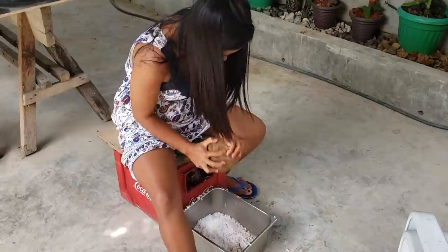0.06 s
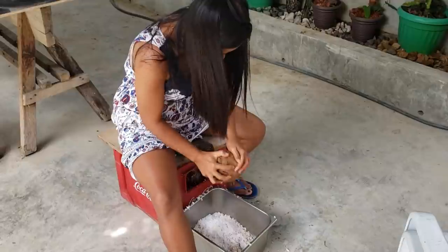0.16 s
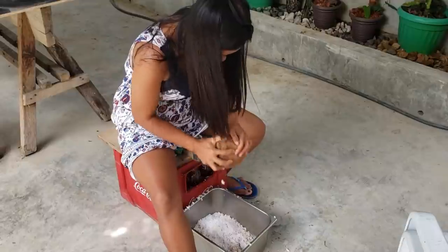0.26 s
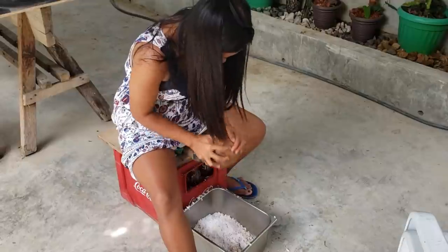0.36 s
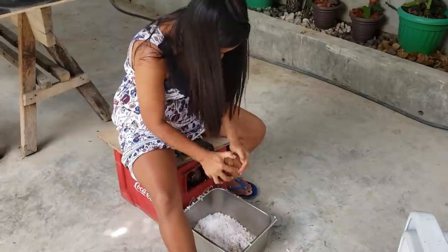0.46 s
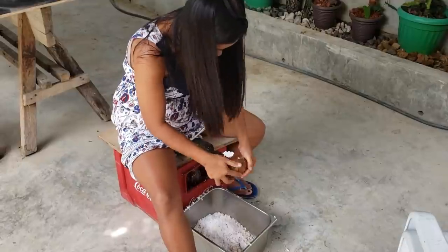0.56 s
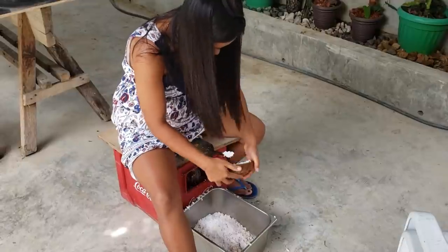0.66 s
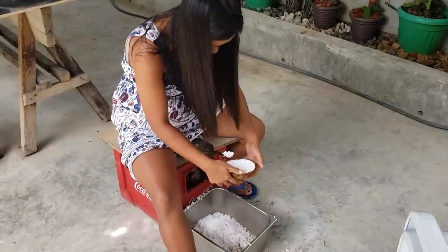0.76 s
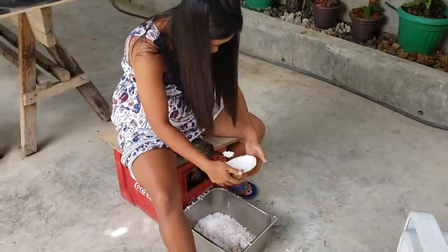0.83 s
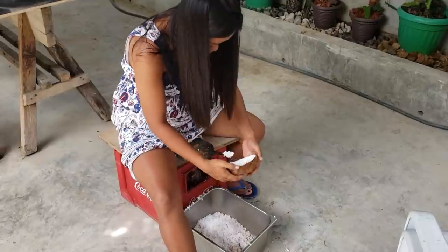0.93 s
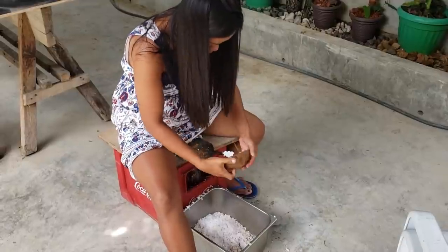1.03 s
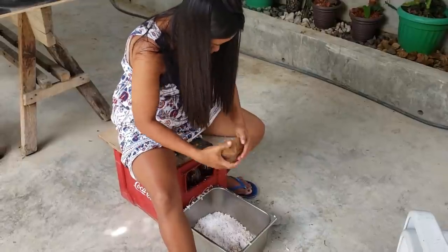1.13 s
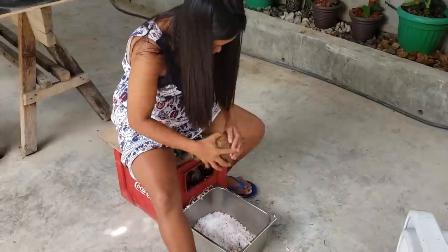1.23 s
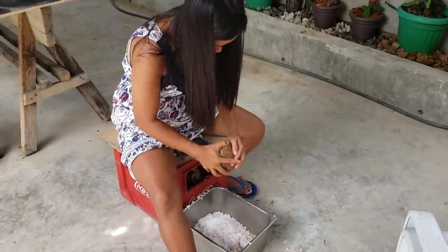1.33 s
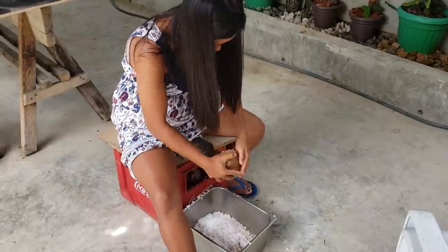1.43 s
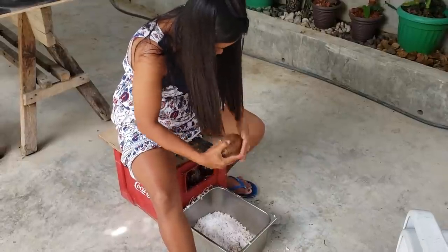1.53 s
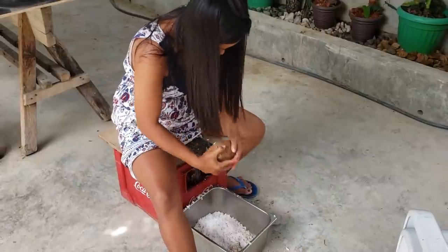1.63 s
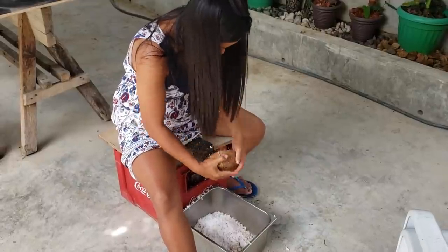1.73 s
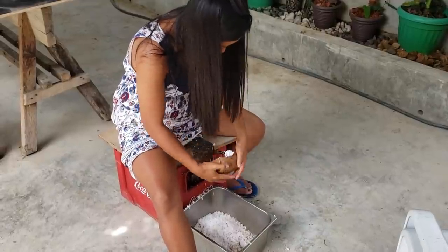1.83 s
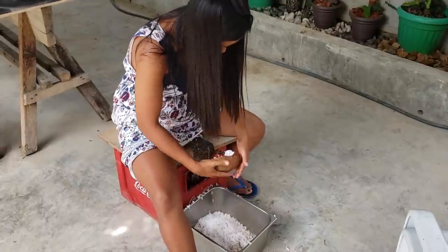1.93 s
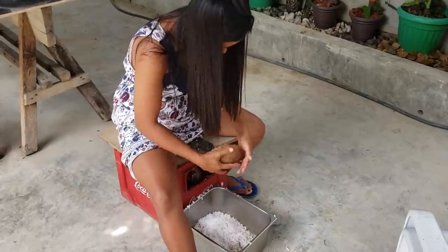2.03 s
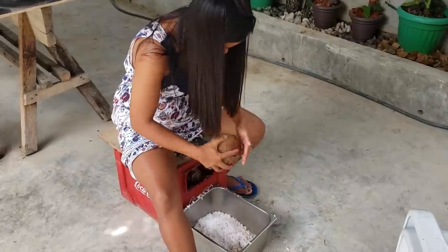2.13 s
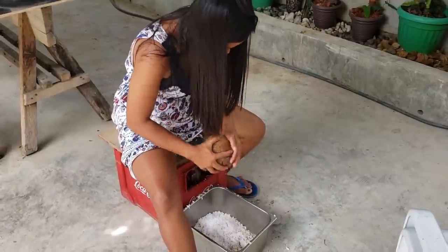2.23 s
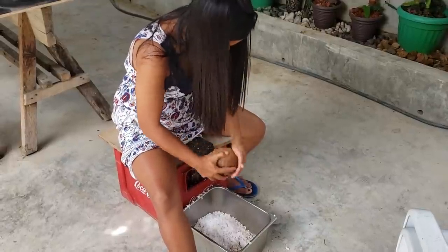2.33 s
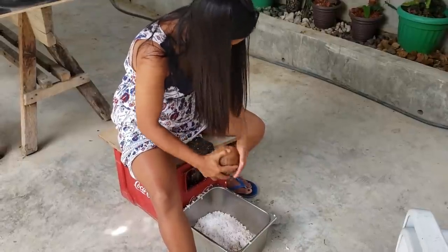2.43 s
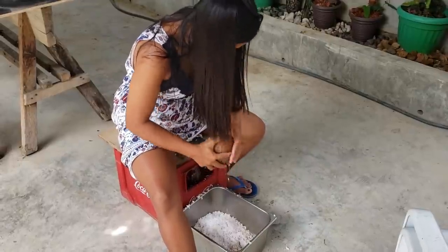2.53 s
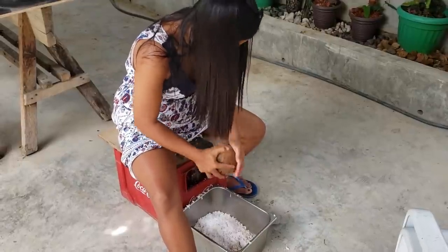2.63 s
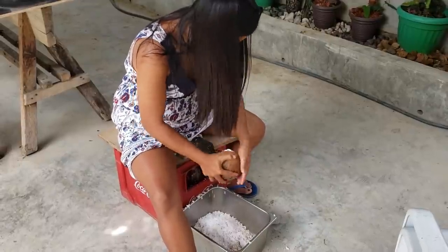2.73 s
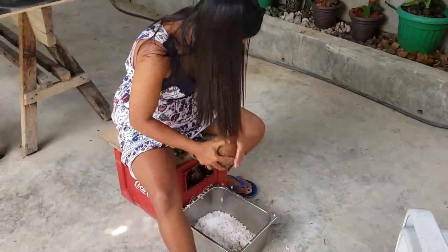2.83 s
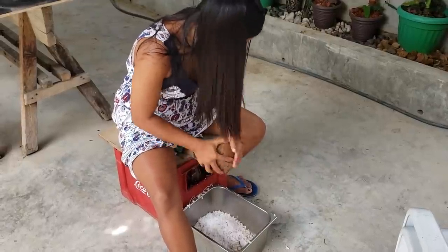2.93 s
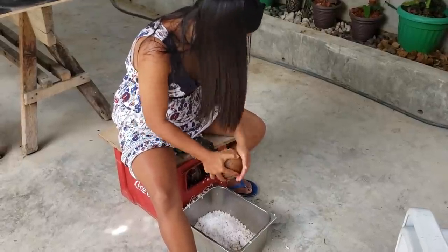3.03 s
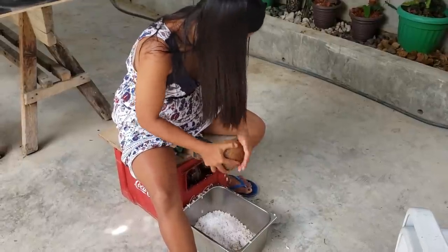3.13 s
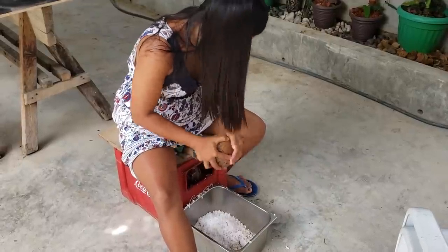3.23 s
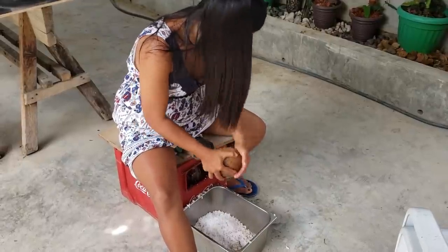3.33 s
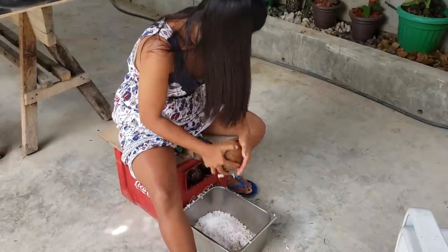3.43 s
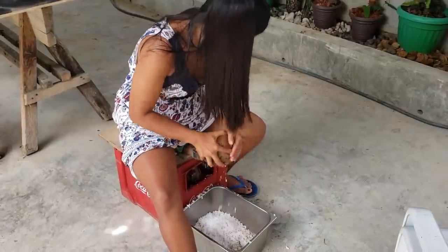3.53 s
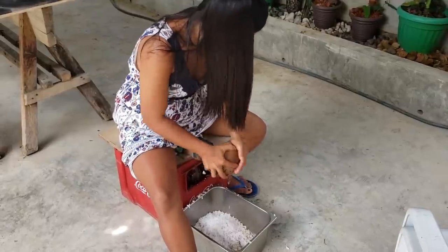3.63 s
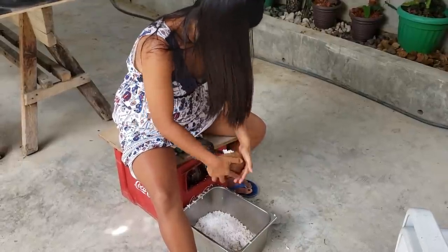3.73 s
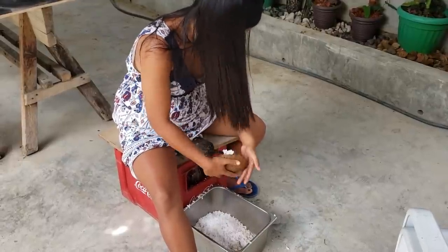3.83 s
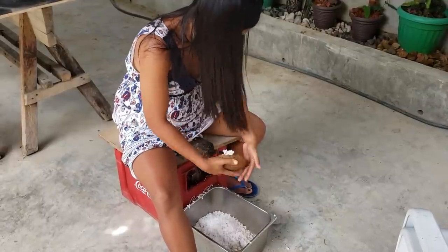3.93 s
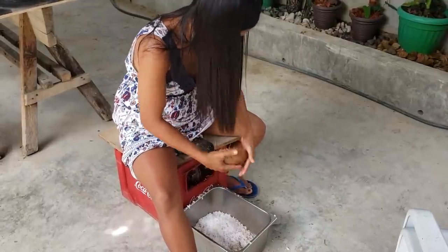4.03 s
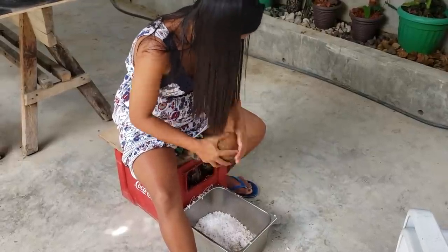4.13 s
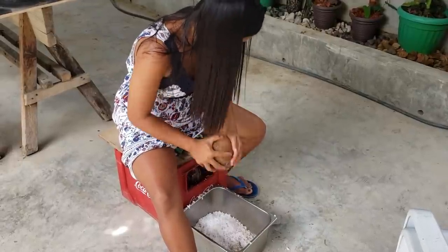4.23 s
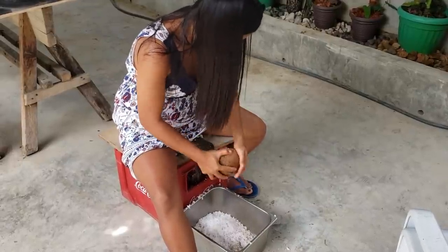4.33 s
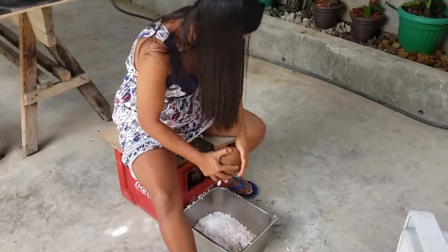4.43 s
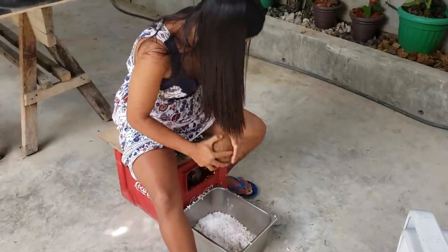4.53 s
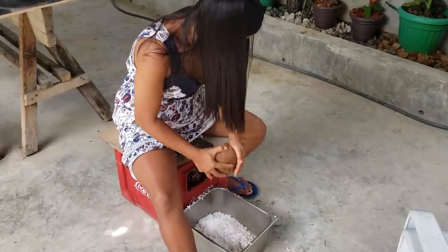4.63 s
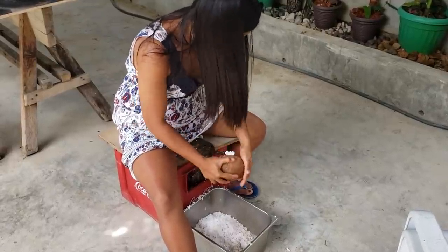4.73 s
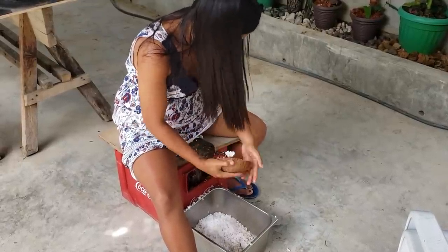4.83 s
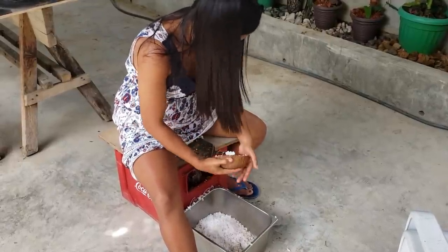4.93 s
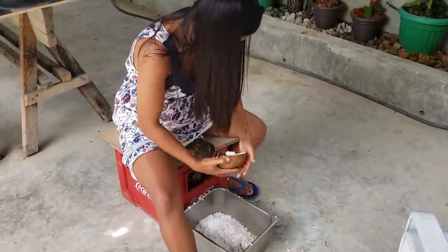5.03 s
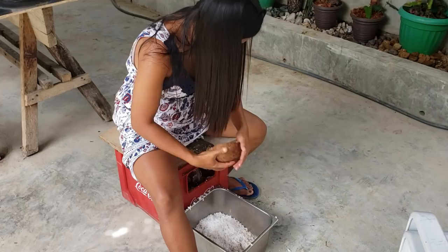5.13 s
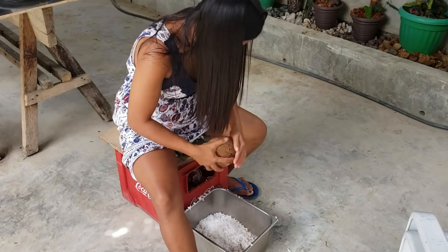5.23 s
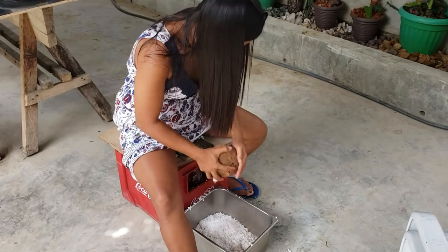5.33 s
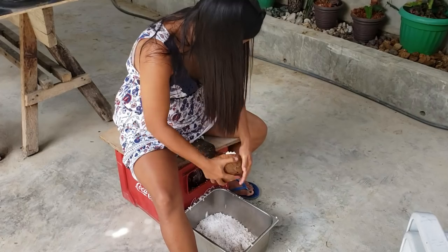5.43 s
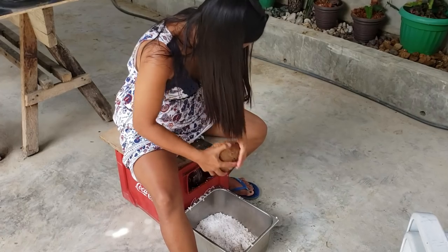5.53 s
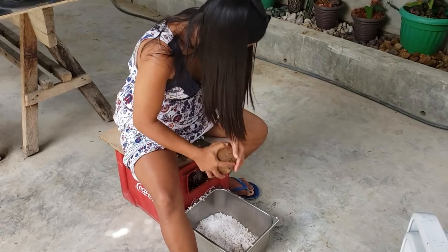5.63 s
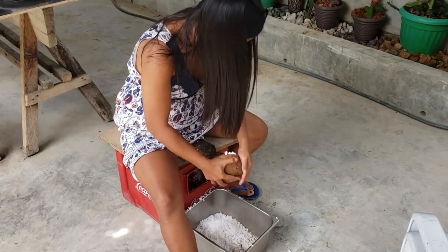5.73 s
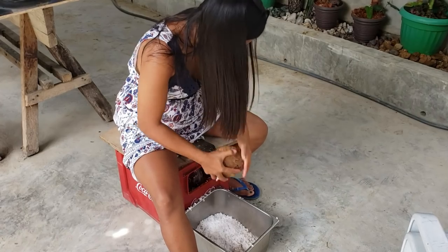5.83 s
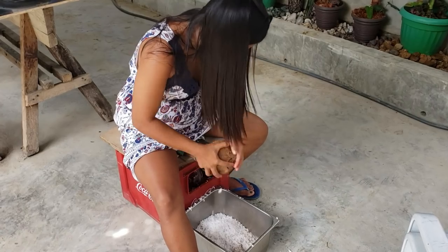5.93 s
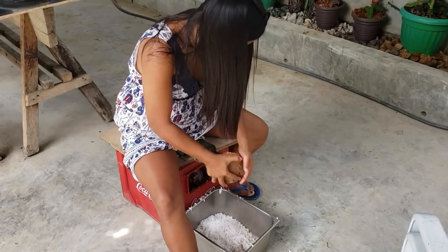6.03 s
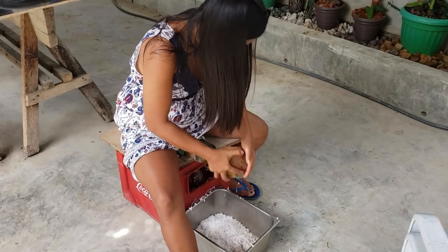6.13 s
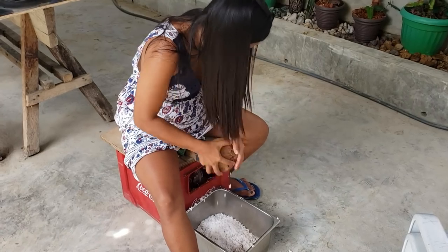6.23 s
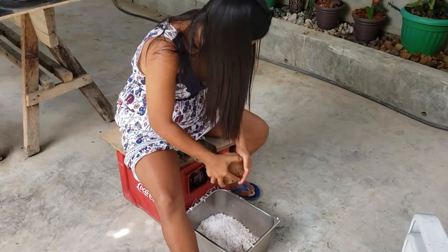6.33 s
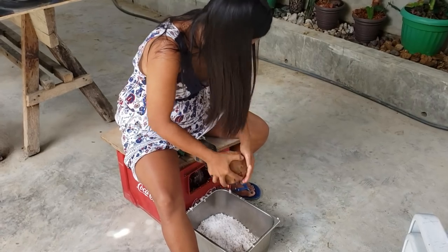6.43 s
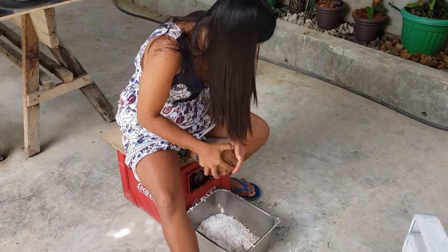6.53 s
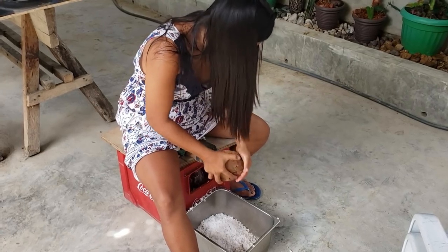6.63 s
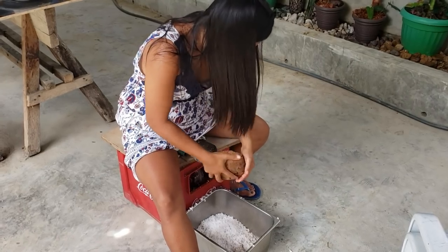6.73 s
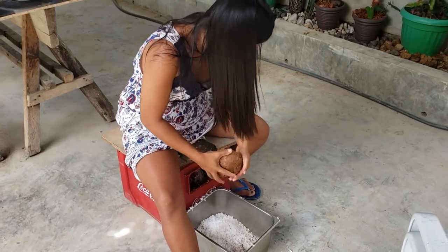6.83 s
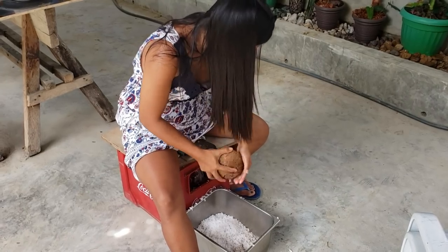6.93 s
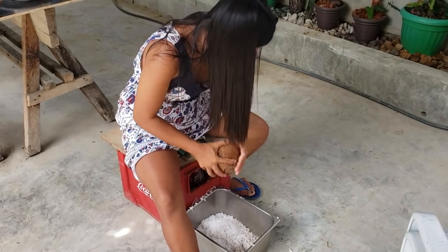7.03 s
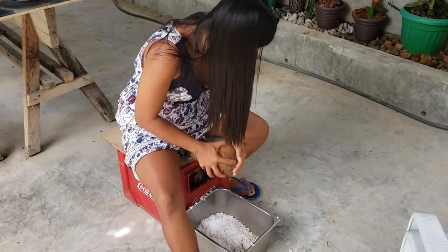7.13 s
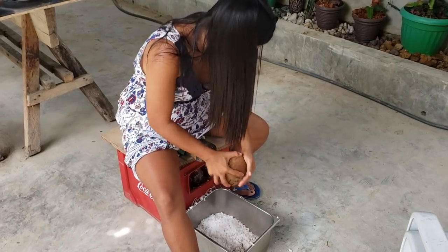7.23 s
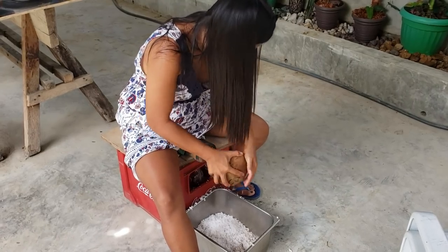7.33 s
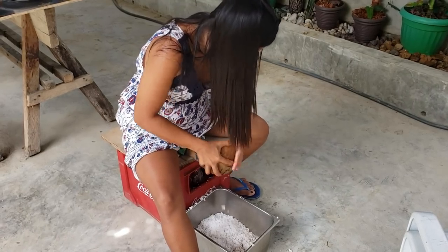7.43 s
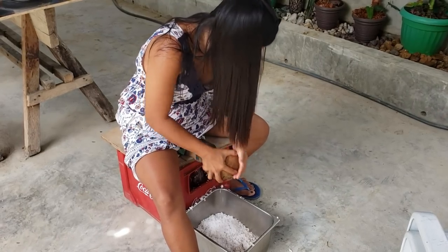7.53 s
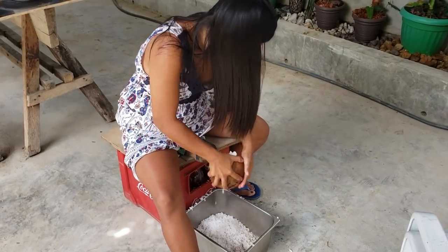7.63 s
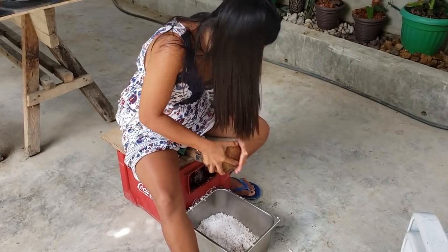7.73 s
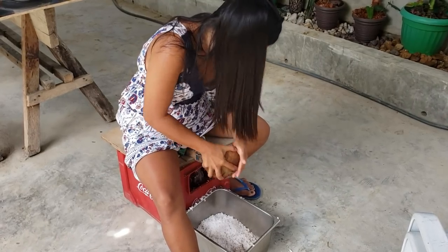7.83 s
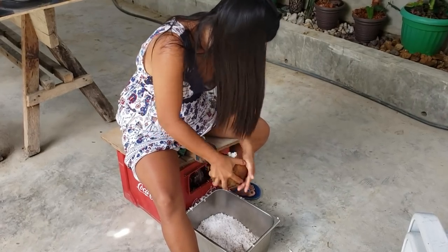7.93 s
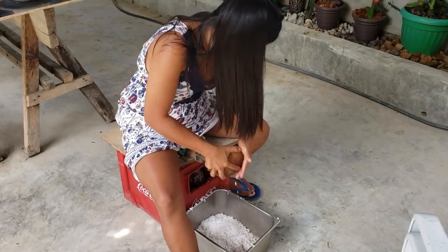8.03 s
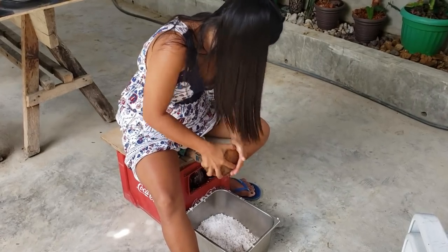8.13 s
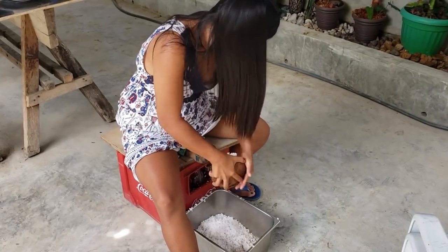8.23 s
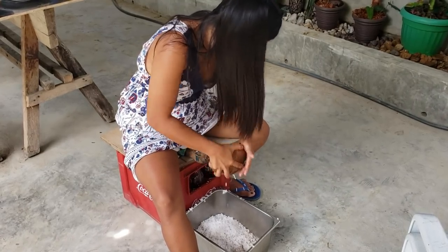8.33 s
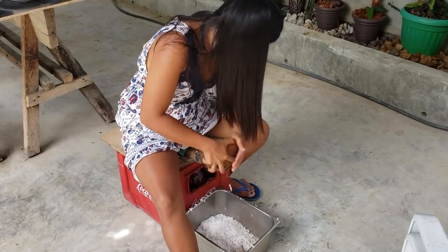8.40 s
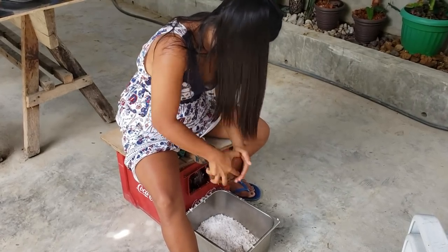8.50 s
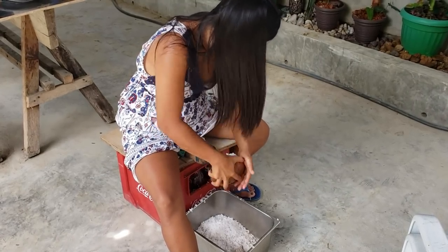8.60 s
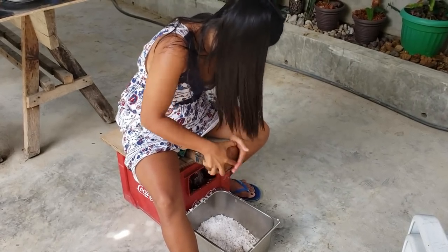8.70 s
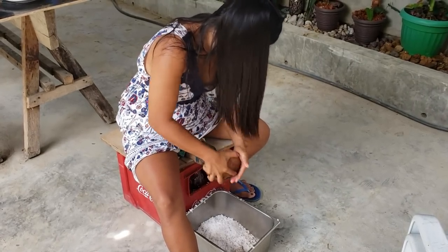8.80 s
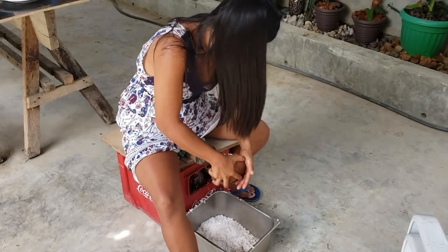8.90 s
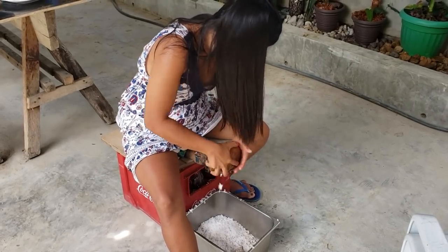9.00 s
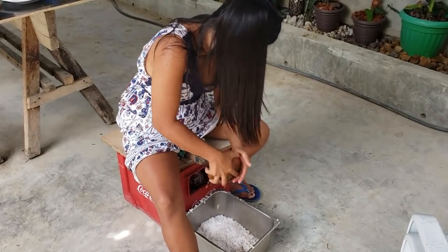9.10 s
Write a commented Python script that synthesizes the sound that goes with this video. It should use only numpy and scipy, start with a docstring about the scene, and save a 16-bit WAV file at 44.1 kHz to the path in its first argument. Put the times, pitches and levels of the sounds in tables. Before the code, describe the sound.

Two sharp scrapes open, then a short pause with soft rustles and tiny distant chirps. Steady coconut scraping follows: gritty tearing, low woody drumming, occasional hard shell clacks and a faint blade ring. A few beats are skipped mid-way, then strokes continue to the end. Close stereo pickup, short concrete reverberation, quiet rumbling outdoor background.

```python
"""Coconut scraped on a toothed blade

A coconut half is pushed down a toothed steel blade that is fixed to a board on a hollow plastic crate.
The teeth catch and slip, which drums the board and crate, and tear the flesh, which rasps and rings the blade.
Impulses and knocks drive resonant bodies; shaped noise makes the tearing, the soft rustles and the yard.
A covered concrete yard answers and hums faintly under far birds; two microphone ports listen from the side."""
import sys
import numpy as np
from scipy import signal
from scipy.fft import rfft, irfft, next_fast_len
from scipy.io import wavfile
from scipy.ndimage import uniform_filter1d, map_coordinates

SR = 44100
rng = np.random.default_rng(int(sys.argv[2]) if len(sys.argv) > 2 else 0)


def file_out(sig):
    """Save sig as 16-bit WAV at sys.argv[1]."""
    # one column per channel
    cols = np.atleast_2d(sig).T
    # limit, then scale
    lim = np.clip(cols, -1, 1)
    pcm = np.round(lim * 32767).astype(np.int16)
    wavfile.write(sys.argv[1], SR, pcm)


N = 403956  # samples

# The shell meets the blade or catches hard. Each row: time in seconds, then relative levels in dB of
# the thump, the clack of the shell and the boom of the crate.
KNOCKS = [(0.087, -23, -49, -47), (0.11, -21.5, -51, -27), (0.371, -21, -44, -46), (0.424, -12, -25, -40),
          (1.179, -34.5, -47, -58), (1.327, -19, -48, -56), (1.596, -20.5, -43, -41),
          (1.695, -21, -44, -40), (2.288, -32, -57, -37), (2.64, -10.5, -54, -41), (2.991, -17, -48, -44),
          (3.303, -9, -24, -21.5), (3.56, -21.5, -44, -39), (3.643, -9, -42, -49), (3.675, -11, -43, -56),
          (4.336, -17, -26, -44), (4.656, -9.5, -13, -24), (4.688, -25, -29, -33), (5.317, -23, -46, -37),
          (5.619, -27.5, -59, -60), (5.661, -27, -50, -54), (6.054, -13, -25, -28), (6.073, -23, -37, -52),
          (6.275, -27, -54, -35), (6.588, -24.5, -40, -35), (6.623, -18, -34, -32),
          (7.545, -23.5, -38, -34), (7.822, -30, -53, -39), (8.134, -20.5, -51, -42),
          (8.184, -12.5, -26, -31), (8.465, -27.5, -49, -41), (8.51, -21.5, -41, -45),
          (8.757, -30, -58, -42), (8.822, -9.5, -17, -25), (9.086, -22, -48, -47)]


def amp(db):
    """Decibels are logarithmic: 20 dB is a tenfold gain."""
    return 10 ** (np.asarray(db) / 20)


def unit(x):
    """Normalisation by the root mean square, to rms 1."""
    return x / np.sqrt(np.mean(x ** 2) + 1e-20)


def along(points, hz):
    """Interpolation of (Hz, value) points on a logarithmic frequency axis."""
    f, v = np.transpose(points)
    return np.interp(np.log(hz + 1), np.log(f + 1), v)


def wobble(rate):
    """Slow random modulation: a smooth curve through normal random knots, rate of them a second."""
    knots = rng.standard_normal(int(N * rate / SR) + 4)
    return map_coordinates(knots, [np.arange(N) * rate / SR])


def filtered(x, response):
    """Linear filtering: the spectrum of x times a complex response of frequency."""
    m = next_fast_len(N + SR // 2)
    spectrum = rfft(x, m) * response(np.fft.rfftfreq(m, 1 / SR))
    return irfft(spectrum, m)[..., :N]


def ringing(modes):
    """Modal superposition: damped resonances of alternating sign add up to a body's causal response."""
    def response(f):
        return sum((-1) ** k * amp(db) * 1j * f * width / (centre ** 2 - f * f + 1j * f * width)
                   for k, (centre, width, db) in enumerate(modes))
    return response


def through(force, response):
    """Source and filter: a body driven by a force, scaled so that white driving would keep its rms."""
    power = np.mean(np.abs(response(np.linspace(1, SR / 2, 8192))) ** 2)
    return filtered(force, response) / np.sqrt(power)


def slips(rate, scatter_db):
    """Stick-slip as random impulses of either sign, rate a second, rms 1; some are much larger."""
    happen = rng.random(N) < rate / SR
    size = amp(scatter_db * np.minimum(rng.exponential(size=N), 4))
    return unit(happen * size * rng.choice([-1, 1], size=N))


def spread(pair):
    """Diffuse-field coherence: unrelated signals are mixed so that bass is shared and treble is not."""
    # Each row: frequency in Hz, left-right correlation from -1 to 1.
    likeness = [(60, 0.8), (180, 1), (550, 0.71), (1650, -0.097), (4970, 0.012), (15000, -0.023)]

    def turn(hz):
        return np.arccos(np.clip(along(likeness, hz), -1, 1)) / 2

    mid, side = filtered(pair, lambda hz: np.array([np.cos(turn(hz)), np.sin(turn(hz))]))
    return np.array([mid + side, mid - side])


def yard():
    """Ambient noise of far traffic and leaves: a patchy spectrum whose overall level drifts."""
    # Spectrum of the yard at rest. Each row: frequency in Hz, relative density in dB per Hz.
    colour = [(15, -44), (32, -7), (59, 3.5), (107, -4), (169, -5.5), (267, -11.5), (380, -12.5),
              (800, -21.5), (2200, -19), (4000, -21), (6000, -26), (8200, -31.5), (11200, -28),
              (15600, -44)]
    # Course of the level before its random drift. Each row: time in seconds, level in dB.
    level_points = [(0, -46.5), (.9, -49), (2.1, -49), (4, -48.5), (5.1, -48.5), (6.9, -46.5), (7.8, -46.5),
                    (9.16, -47.5)]
    z = signal.stft(rng.standard_normal((2, N)), nperseg=1024)[2]
    # Smooth random patches over frequency, then time
    patches = uniform_filter1d(rng.standard_normal(z.shape[1:]), 8, 0)
    patches = uniform_filter1d(patches, 6, 1)
    pair = signal.istft(z * amp(1.26 * unit(patches)), nperseg=1024)[1][:, :N]
    coloured = filtered(pair, lambda hz: amp(along(colour, hz)))
    level_db = np.interp(np.arange(N) / SR, *np.transpose(level_points)) + 2.1 * wobble(2.55)
    return amp(level_db) * unit(spread(coloured))


def birds():
    """Thin chirps of far birds: sine tones with a random walk in phase, so slightly unsteady in pitch."""
    # Each row: centre time in seconds, length in seconds, frequency in Hz, peak level in dB.
    chirps = [(.86, .04, 4750, -57), (.815, .03, 6250, -62), (.495, .03, 5700, -48), (1.53, .04, 4200, -59)]
    out = np.zeros(N)
    for s, length, hz, db in chirps:
        t = np.arange(int(length * SR))
        phase = 2 * np.pi * hz * t / SR + np.cumsum(rng.normal(0, 0.076, len(t)))
        start = round((s - length / 2) * SR)
        out[start:][:len(t)] += amp(db) * np.hanning(len(t)) * np.sin(phase)
    return out


def walls(x):
    """Reverberation of roof and walls: decaying noise tails, renewed as the worker sways."""
    # Each row: frequency in Hz, time in seconds to decay by 60 dB.
    decay = [(100, 0.2), (400, 0.34), (2000, 0.41), (8000, 0.18)]
    out, step = np.zeros((2, N + SR)), SR // 3
    for start in range(0, N, step):
        hz, t, z = signal.stft(rng.standard_normal((2, SR // 2)), SR, nperseg=256)
        fall_db = -60 * t / along(decay, hz)[:, None]
        tail = signal.istft(z * amp(fall_db), SR, nperseg=256)[1]
        tail = tail / np.linalg.norm(tail[0])
        wet = signal.fftconvolve(x[None, start:start + step], tail, axes=1)
        out[:, start + 300:][:, :wet.shape[1]] += wet  # 300 samples of delay
    return spread(out[:, :N])


def rustles_and_bump():
    """Brief swells of band-passed noise: rustles of skin and fibre, and one low bump near 4.1 s."""
    # Each row: centre time in seconds, length in seconds, centre frequency in Hz, relative level in dB.
    swells = [(0.808, 0.07, 3500, -55), (0.896, .05, 4500, -53.5), (1.215, 0.086, 4000, -58),
              (4.123, 0.11, 90, -45), (4.544, .04, 4000, -55), (4.988, 0.057, 2510, -57),
              (5.187, 0.1, 3800, -52), (6.753, 0.011, 6100, -47)]
    out = np.zeros(N)
    for s, length, hz, db in swells:
        swell = np.hanning(int(length * SR))
        sos = signal.butter(2, [hz * 0.81, hz * 1.2], "bandpass", fs=SR, output="sos")
        noise = unit(signal.sosfilt(sos, rng.standard_normal(len(swell))))
        start = round((s - length / 2) * SR)
        out[start:][:len(swell)] += amp(db) * swell * noise
    return out


def effort():
    """Contact force as gains of judder, rasp and ring: each row rises, holds and dies as the shell lifts."""
    # One row a stroke or light brush of the teeth; the second stroke has two rows, a sharp bite and
    # its hold. Each row: time of full bite, rise and hold in seconds,
    # sag over the hold in dB (before its share), then relative levels in dB of the judder in the seat,
    # the rasp of the teeth and the ring of the blade.
    strokes = [(0.113, 0.087, 0.071, 2, -22.5, -47, -41), (0.418, 0.022, 0.016, 9, -12, -38, -23),
               (0.465, 0.033, 0.03, -4.5, -26.5, -50, -62), (0.788, 0.073, .02, 6, -56, -60, -56.5),
               (1.2, 0.16, 0.082, 1, -71, -75, -56), (1.327, 0.087, .09, -3.3, -28.5, -51, -42.5),
               (1.692, 0.072, 0.06, -2.5, -28.5, -53, -42.5), (2.301, 0.064, 0.07, -3.4, -25, -49.5, -43),
               (2.64, 0.075, 0.077, -3.9, -26, -48.5, -42), (2.988, 0.076, 0.074, 0.7, -22, -45.5, -38),
               (3.303, 0.056, 0.075, 10.5, -16, -44, -36.5), (3.623, 0.055, 0.099, 4, -20, -45.5, -37),
               (3.948, 0.064, 0.044, 4, -61, -60.5, -66), (4.269, 0.066, 0.1, -5.5, -27.5, -48.5, -41),
               (4.613, 0.04, .1, 2, -22.5, -47.5, -39.5), (5.316, 0.047, 0.095, -5, -29.5, -51.5, -47.5),
               (5.668, .05, 0.062, -4.5, -26, -51, -42.5), (5.997, 0.058, 0.063, -2, -22, -47.5, -42),
               (6.323, 0.061, 0.053, 1.5, -20, -45, -41), (6.639, 0.074, 0.023, 3.5, -23, -46.5, -40.5),
               (7.185, 0.063, 0.078, 2.5, -21, -48, -41), (7.423, 0.14, 0.063, -2, -69, -62, -57),
               (7.569, 0.085, 0.035, 5, -19.5, -44, -38), (7.867, 0.069, 0.064, 0.5, -26.5, -48.5, -42.5),
               (8.1, 0.074, .03, 8, -63, -74, -70), (8.194, 0.06, 0.053, 7.5, -20, -44.5, -37),
               (8.498, 0.064, 0.077, 6.5, -21, -43.5, -35), (8.727, 0.096, 0.035, 2, -54, -57, -63),
               (8.813, 0.058, 0.056, 3, -20, -46, -39), (9.129, 0.085, .05, 7, -20.5, -43.5, -37)]
    rise_db = 30  # climbed in the rise time at steepness 1
    # Columns: judder, rasp, ring
    steep, share, fade, lift = np.array([
        [0.9, 0.64, 0.97],   # steepness of the rise
        [0.87, 0.52, 0.94],  # share of the sag
        [4.5, 9, 48],        # fading over the hold, dB/s
        [231, 272, 292],     # fall after the hold, dB/s
    ])[..., None]
    shudder_db, shudder_s = -9, 0.055  # judder that a knock sets off: level re its thump; t60

    t, gains = np.arange(N) / SR, np.zeros((3, N))
    for s, rise, hold, sag_db, *levels in strokes:
        near = slice(max(round(s * SR) - SR // 4, 0), round(s * SR) + SR // 2)
        u = t[near] - s
        held = np.clip(u, 0, hold)
        drop_db = steep * rise_db * np.maximum(-u, 0) / rise
        drop_db = drop_db + share * sag_db * held / hold + fade * held
        drop_db = drop_db + lift * np.maximum(u - hold, 0)
        gains[:, near] += amp(np.c_[levels] - drop_db)
    for s, thump_db, *others in KNOCKS:
        start = round(s * SR)
        shudder = amp(thump_db + shudder_db - 60 * t[:SR // 8] / shudder_s)
        gains[0, start:][:SR // 8] += shudder[:N - start]
    return gains


def seat(judder):
    """Forced resonance: stick-slip jolts and knocks drum the board and crate; knocks also clack the shell."""
    # Each row of the three tables: frequency in Hz, width in Hz, relative level in dB.
    # The board that carries the blade:
    board_modes = [(256.2, 16.8, -5.5), (286, 11, -7.5), (356.2, 38, 0), (435, 24, -8), (452.5, 12.6, -3.5),
                   (533.1, 27.5, -3.5), (572.3, 32.5, -8.5), (695, 25, -13), (774, 28, -18),
                   (892, 16.6, -18), (936, 170, -25)]
    # The hollow crate:
    crate_modes = [(65.6, 23, -3), (87, 28, -2.5), (112.7, 19.7, 2.5), (189.8, 23, -6)]
    # The hard shell, damped by the hands; its response is applied twice:
    shell_modes = [(667, 270, 6.5), (1172, 120, -0.5)]
    board, crate, shell = ringing(board_modes), ringing(crate_modes), ringing(shell_modes)

    def soft(f):  # flesh cushions the blows to board and crate
        return 1 / (1 + 1j * f / 900) ** 2

    def small(f, low_hz):  # too small to radiate below its lowest mode
        return (1j * f / (low_hz + 1j * f)) ** 2

    jolts = judder * amp(1.83 * wobble(45)) * slips(rate=350, scatter_db=2.5)
    hits = np.zeros((3, N))
    for s, *levels in KNOCKS:
        hits[:, round(s * SR)] = amp(levels)
    thump, clack, boom = hits
    # The heavy shell lands more slowly than a tooth slips
    thump = through(thump, lambda f: 1 / (1 + 1j * f / 450) ** 3) * amp(-15)

    drummed_board = through(amp(-4.5) * jolts + amp(21.0) * thump,
                            lambda f: board(f) * soft(f) * small(f, 160))
    drummed_crate = through(amp(-16.5) * jolts + amp(26) * boom,
                            lambda f: crate(f) * soft(f) * small(f, 44))
    clacked_shell = through(amp(19.5) * clack, lambda f: shell(f) ** 2)
    return drummed_board + drummed_crate + clacked_shell


def teeth(rasp, ring):
    """Fracture noise and blade resonance: many teeth tear at once; each port faces partly other teeth."""
    # Torn flesh. Each row: frequency in Hz, relative density in dB per Hz.
    flesh = [(700, -14), (1300, -4), (1600, -13.5), (2500, -3.5), (3300, -11), (5500, -10.5), (7000, -14.5),
             (8300, -18.5), (10700, -17), (13800, -25), (15600, -35)]
    # Steel blade. Each row: frequency in Hz, width in Hz, relative level in dB.
    blade_modes = [(1141, 91, -5), (1256, 60, -1), (1581, 41, -7), (1757, 116, -6.5), (1920, 61, -6),
                   (1967, 38, 0), (2047, 27, 4), (2173, 91, 1.5), (2254, 34, -5), (2306, 36, -1),
                   (2400, 26, -3), (2623, 84, -13), (2963, 130, -11.5), (3950, 90, -14)]
    unevenness = amp(1.75 * wobble(35))
    shared = slips(rate=6000, scatter_db=1.0)
    bites = np.array([unit(shared + 2.5 * slips(rate=6000, scatter_db=1.2)) for port in range(2)])
    tear = through(rasp * unevenness * bites, lambda f: amp(along(flesh, f)))
    plucks = ring * amp(3.16 * wobble(60)) * slips(rate=600, scatter_db=2.5)
    steel = through(plucks, ringing(blade_modes))
    return amp(6.5) * tear + amp(1.5) * steel


def scene():
    """Arrival-time difference: rasp reaches the right port first; long bass waves bend and lag less."""
    judder, rasp, ring = effort()
    low, high = seat(judder), teeth(rasp, ring) + rustles_and_bump()
    # The left port lags by 4 samples in the low part and 18 in the high part
    left = np.pad(low, (4, 0))[:N] + amp(-3) * np.pad(high[0], (18, 0))[:N]
    right = low + amp(-3) * high[1]
    answer = walls(amp(-8.5) * low + amp(-5.0) * high[0])
    return np.array([left, right]) + answer + yard() + birds()


def record(dry):
    """Transducer response: the ports differ in colour, lose the deepest bass and stop at a band limit."""
    # Colour of the ports. Each row: frequency in Hz, left minus right in dB.
    balance = [(60, 2.5), (350, 3), (700, 3.5), (1500, 1), (2100, -0.5), (2700, 4.5), (4500, -2.5),
               (7000, -2), (10000, -3.5), (15000, -2)]
    # Dips that the housing cuts, a list for the left port and one for the right.
    # Each row: frequency in Hz, width in Hz, depth in dB.
    port_dips = [
        [(8200, 1400, -22.5)],
        [(3100, 1120, -8), (8030, 2250, -9.5)],
    ]
    top_hz = 15750

    def dips_db(hz):
        return np.array([sum(db / (1 + (2 * (hz - centre) / width) ** 2) for centre, width, db in port)
                         for port in port_dips])

    def response(hz):
        colour_db = np.outer([.5, -.5], along(balance, hz))
        bass_cut = (1j * hz / (45 + 1j * hz)) ** 2
        return amp(colour_db + dips_db(hz)) * bass_cut * (hz < top_hz)

    return filtered(dry, response)


dry = scene()
out = record(dry)
file_out(out)
```